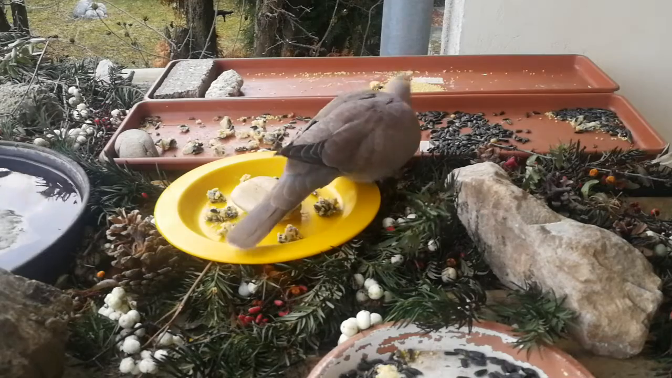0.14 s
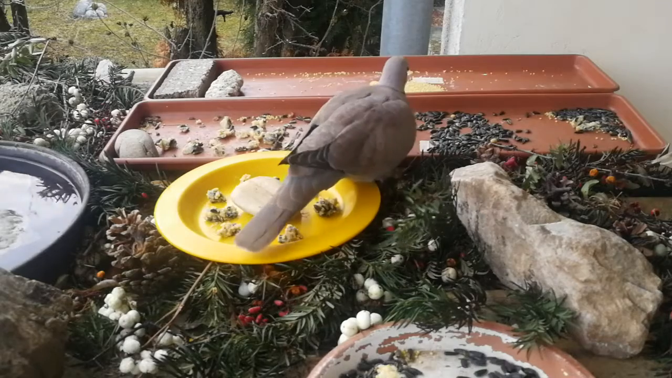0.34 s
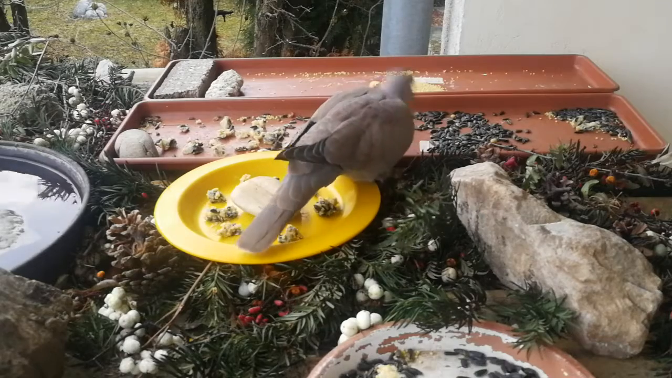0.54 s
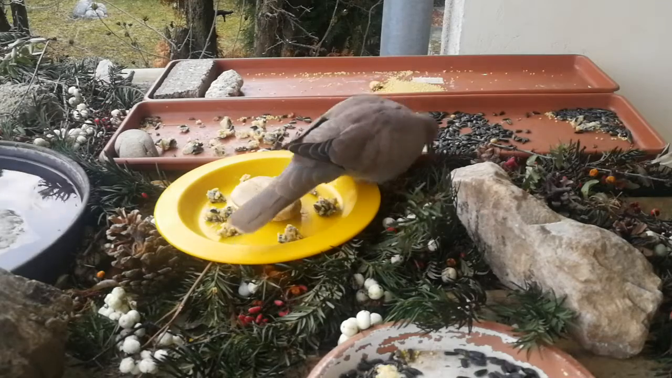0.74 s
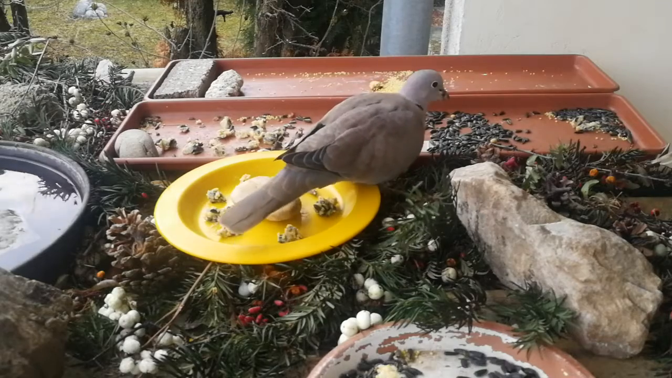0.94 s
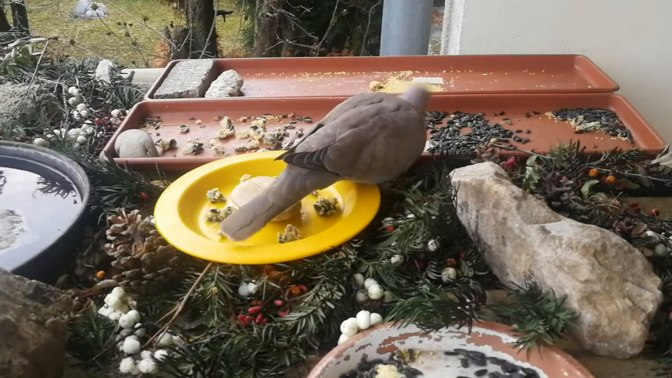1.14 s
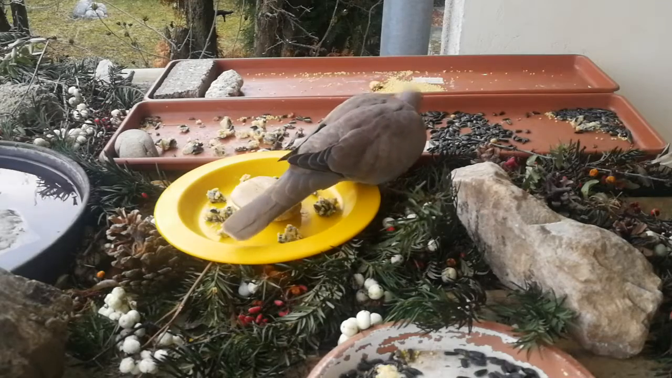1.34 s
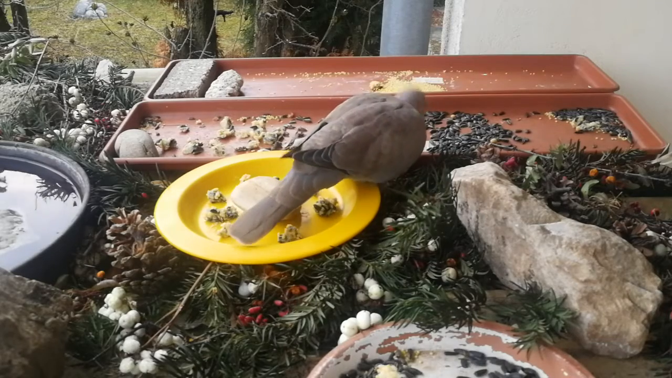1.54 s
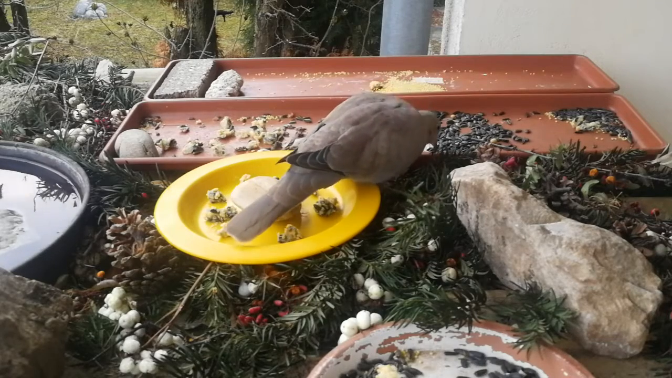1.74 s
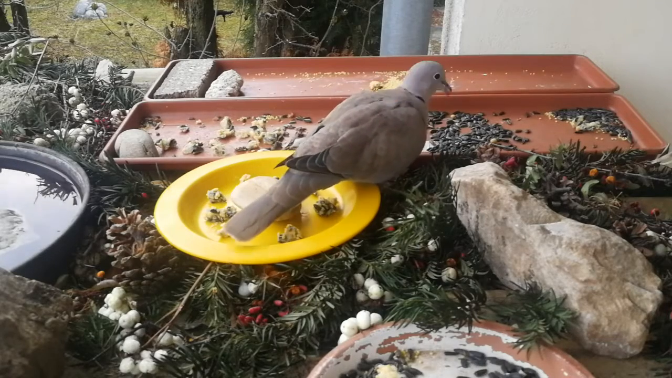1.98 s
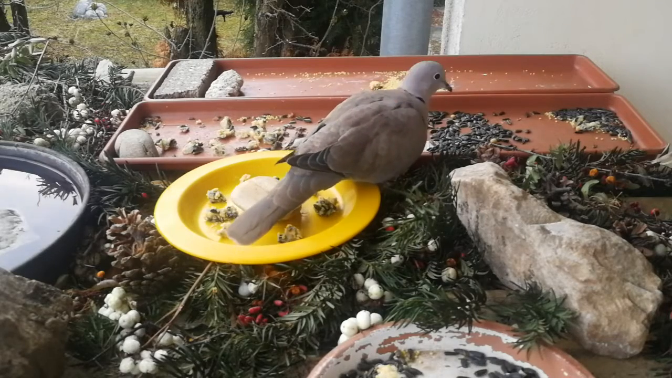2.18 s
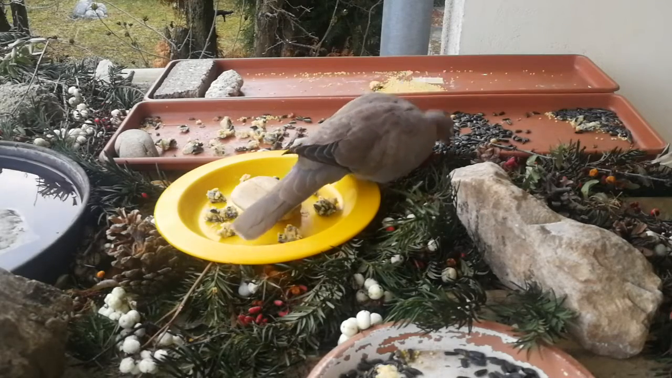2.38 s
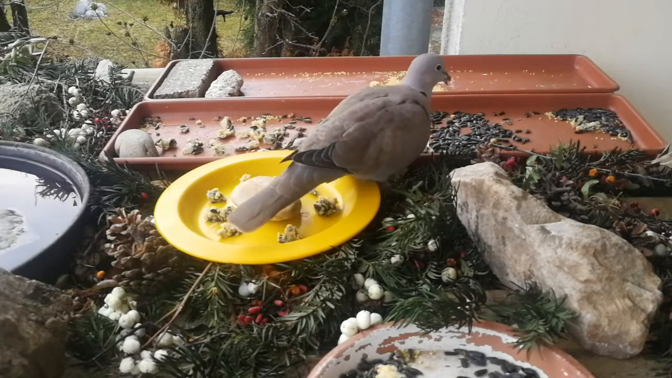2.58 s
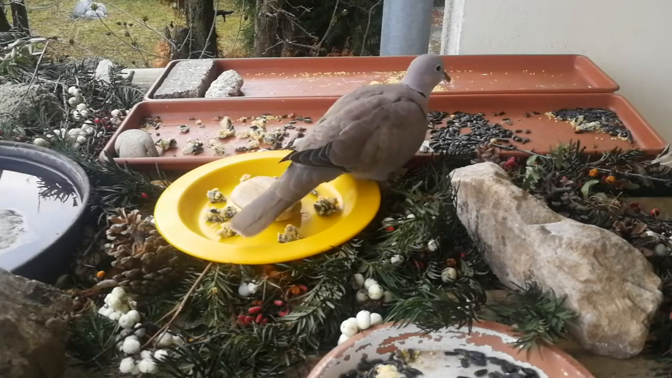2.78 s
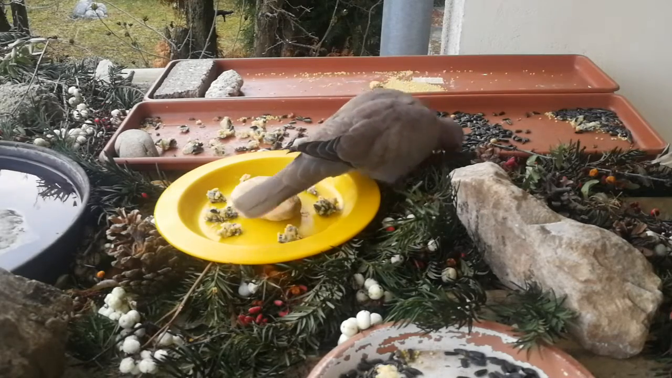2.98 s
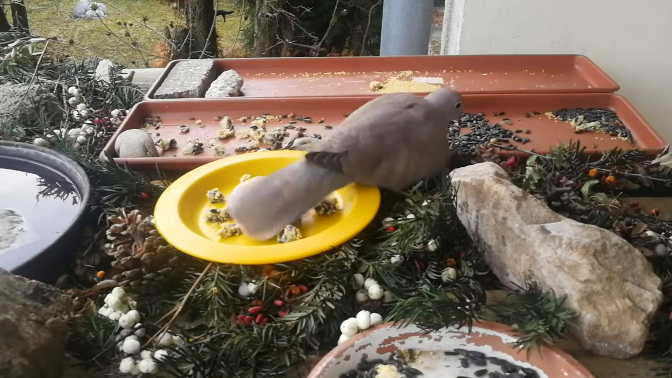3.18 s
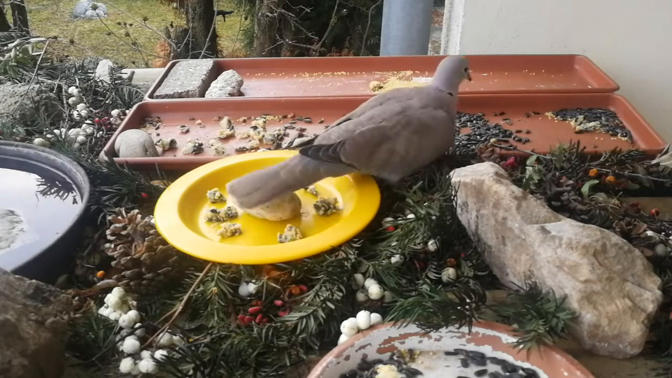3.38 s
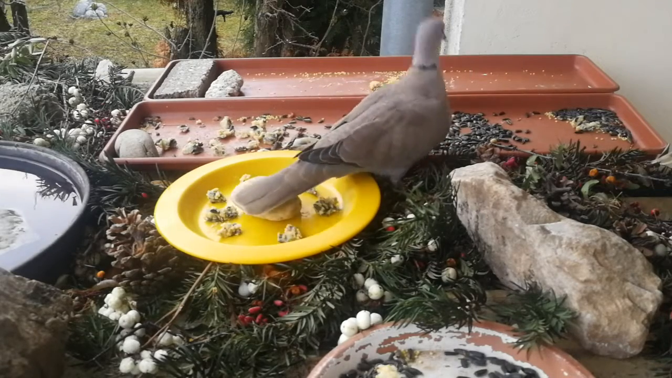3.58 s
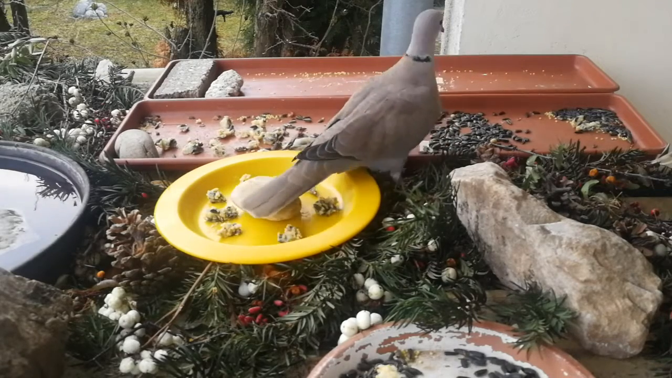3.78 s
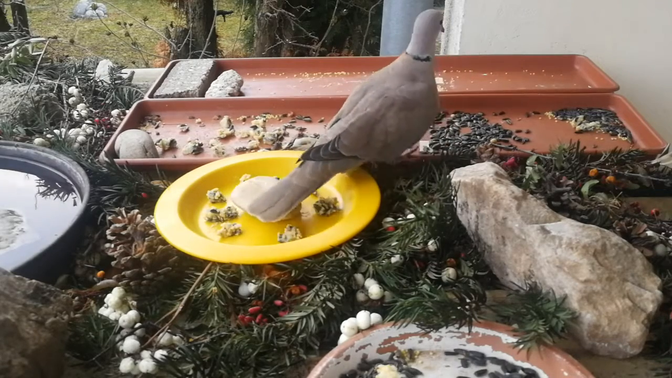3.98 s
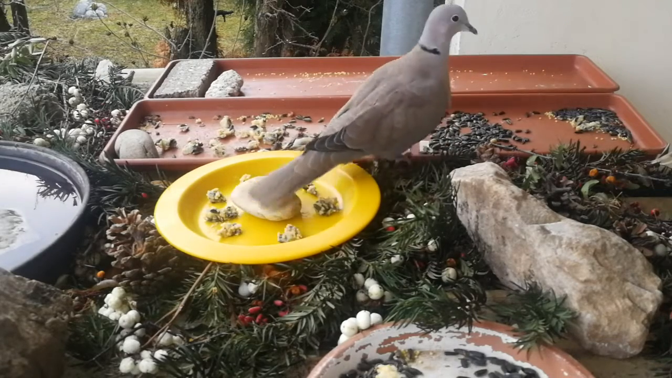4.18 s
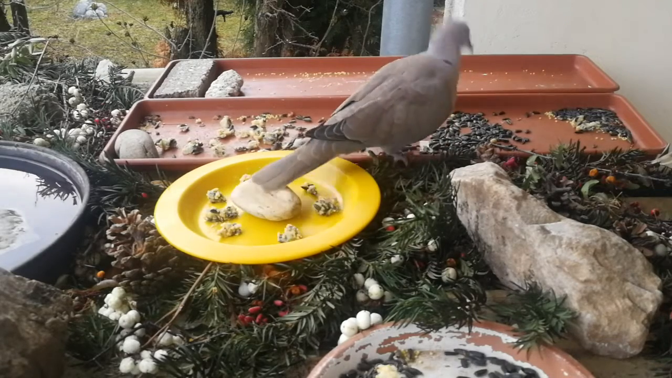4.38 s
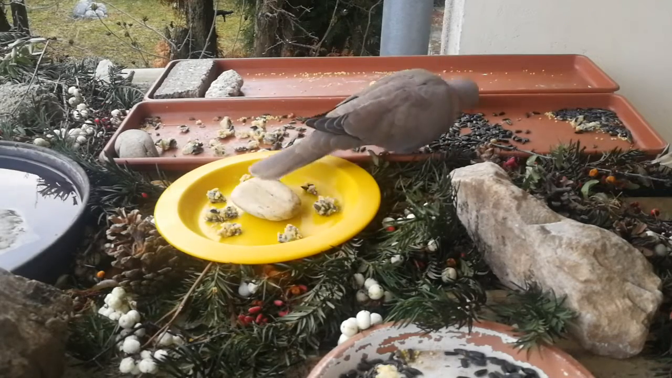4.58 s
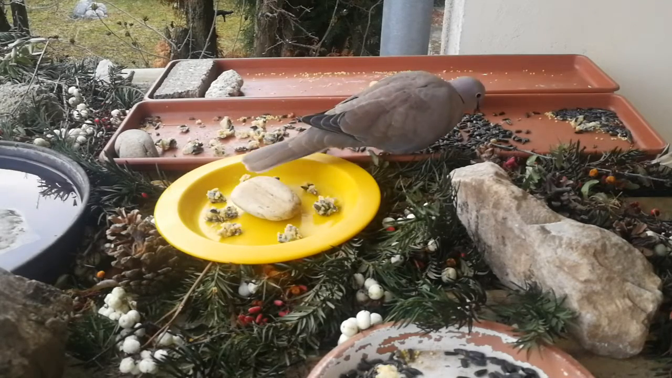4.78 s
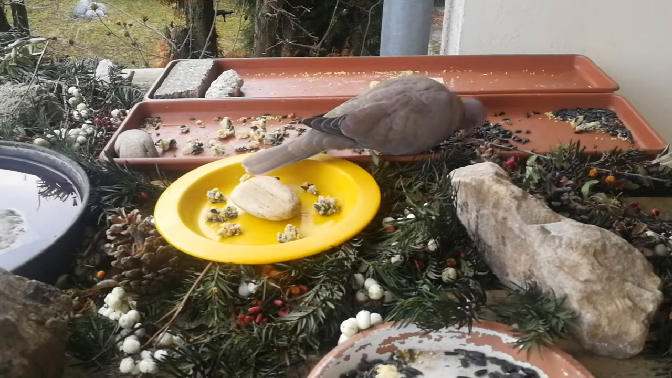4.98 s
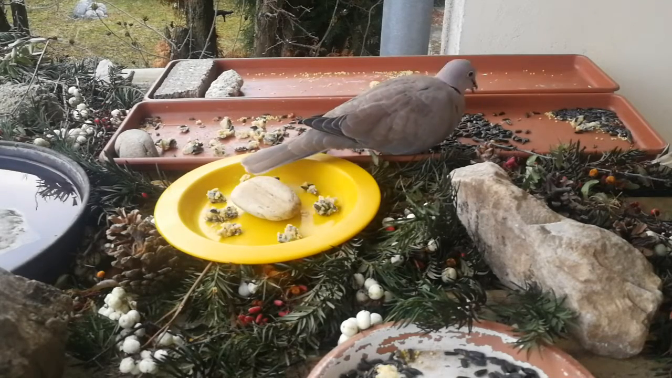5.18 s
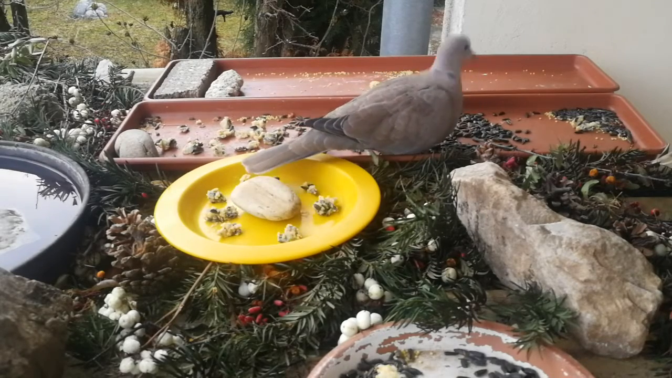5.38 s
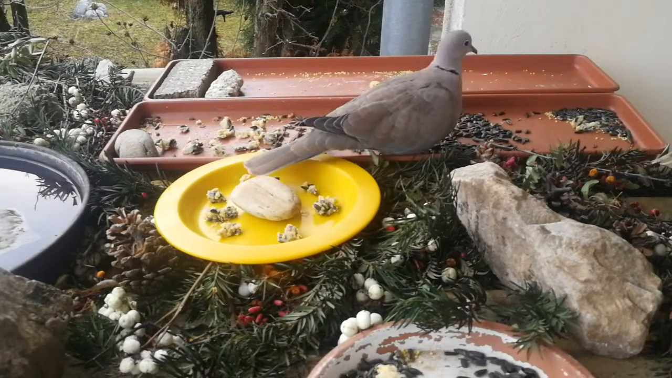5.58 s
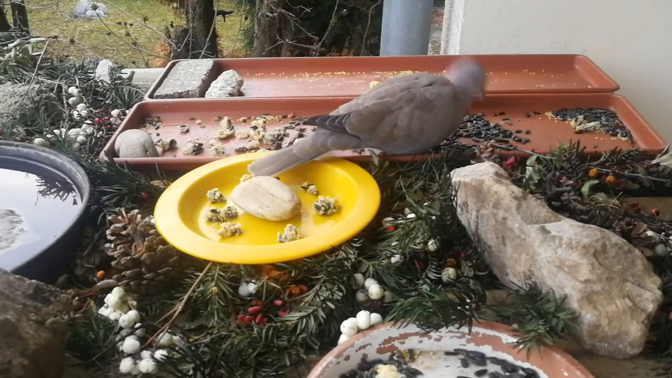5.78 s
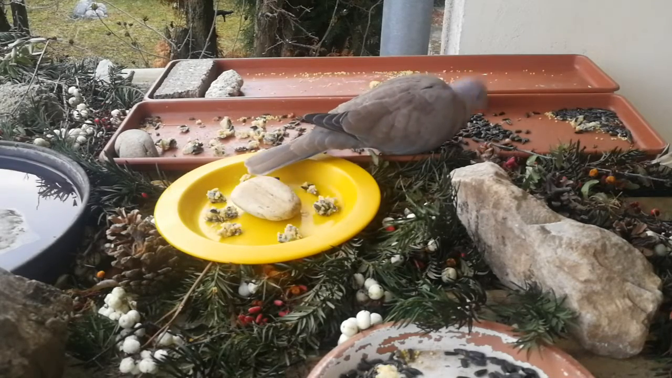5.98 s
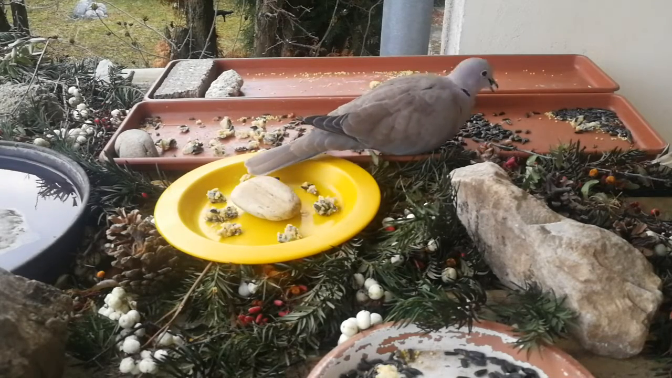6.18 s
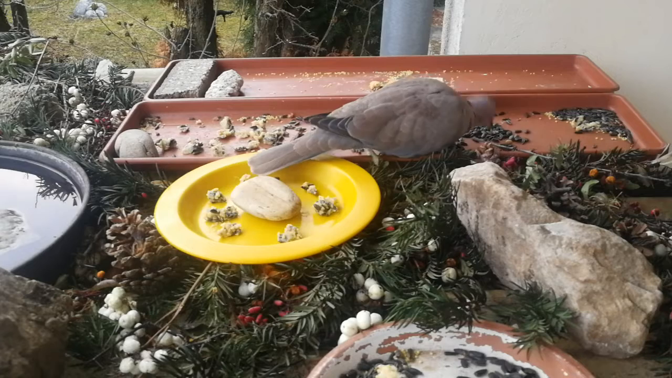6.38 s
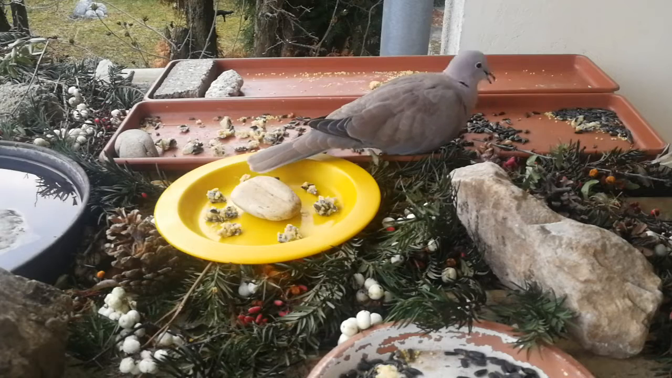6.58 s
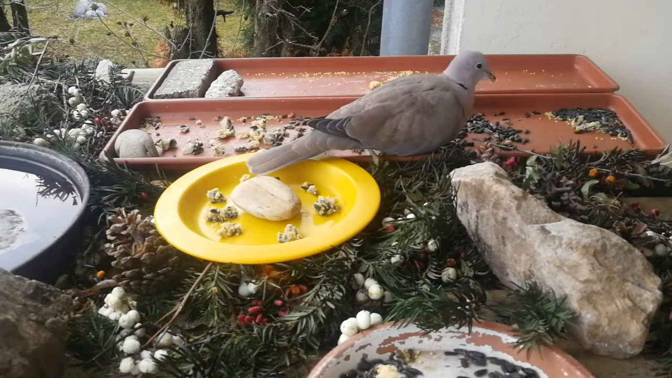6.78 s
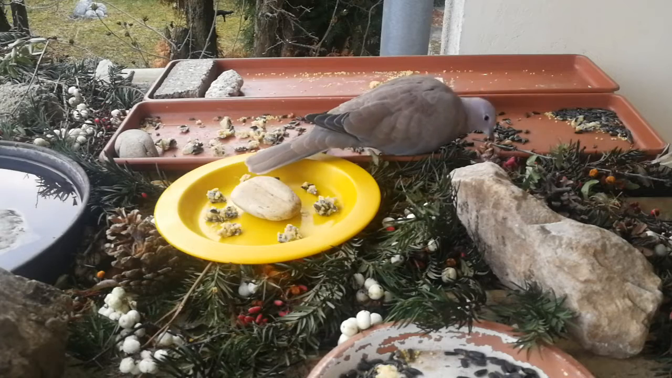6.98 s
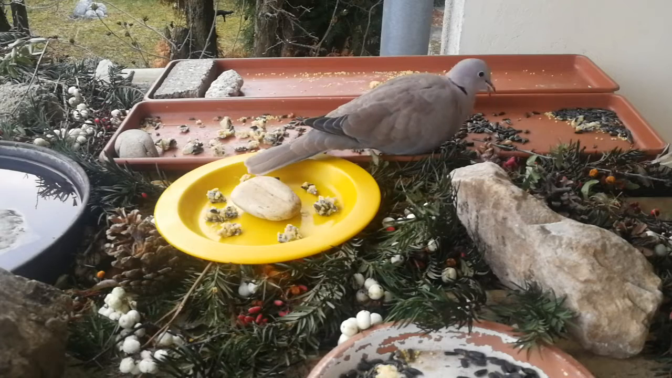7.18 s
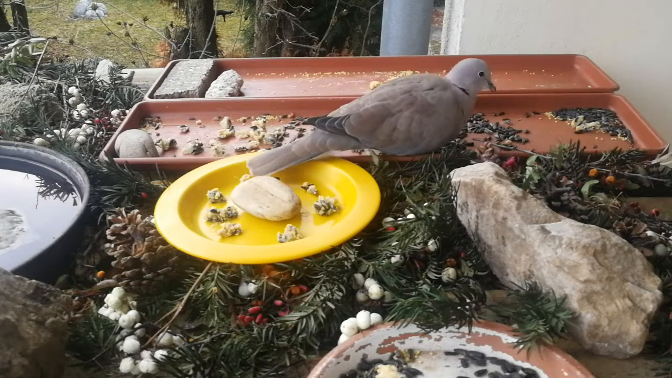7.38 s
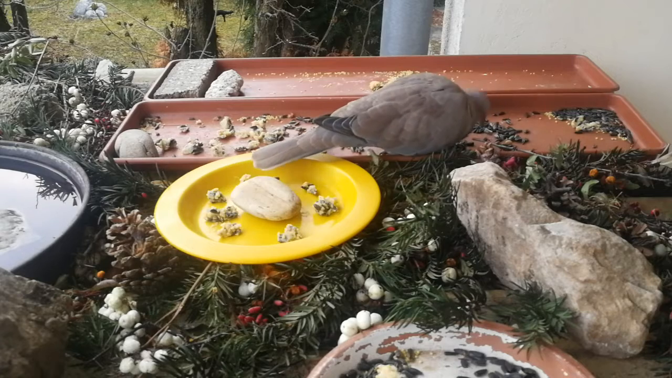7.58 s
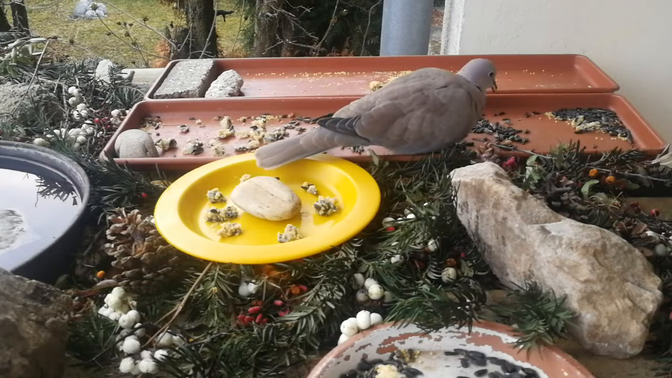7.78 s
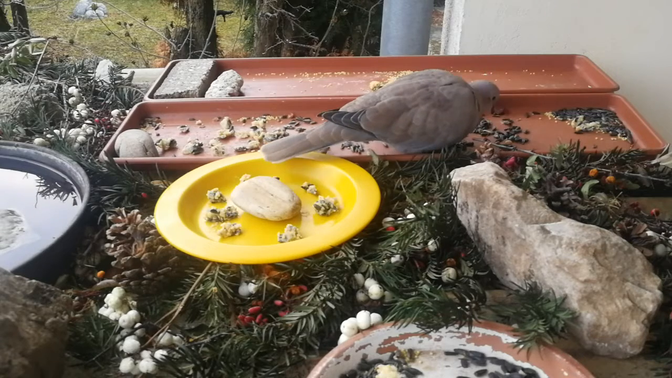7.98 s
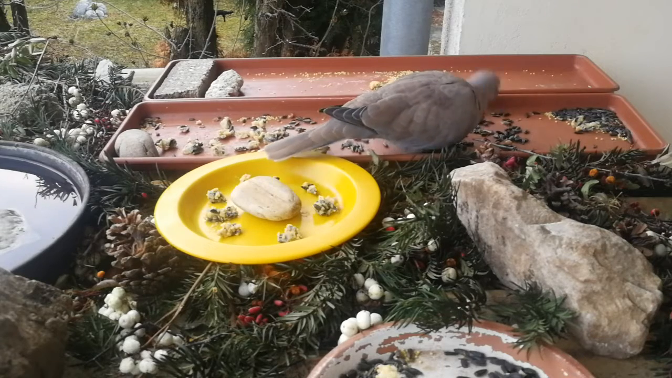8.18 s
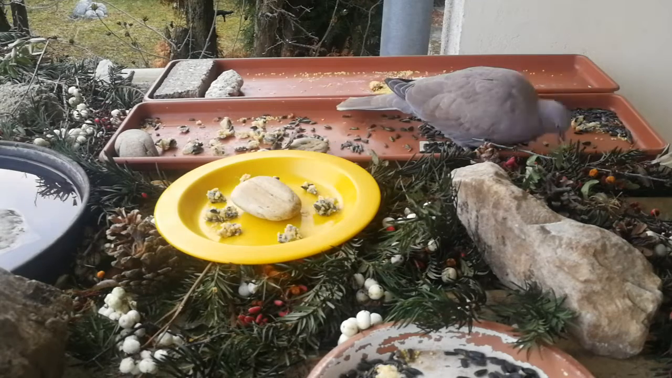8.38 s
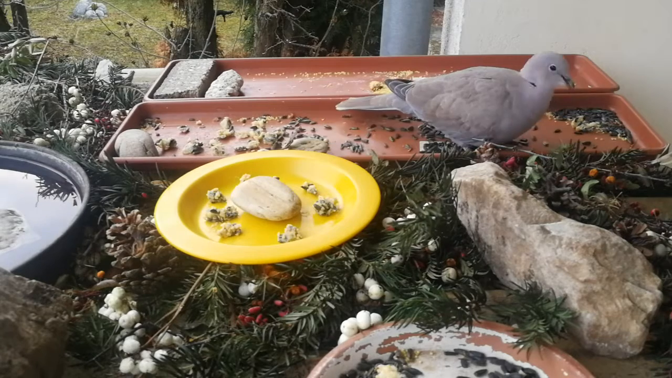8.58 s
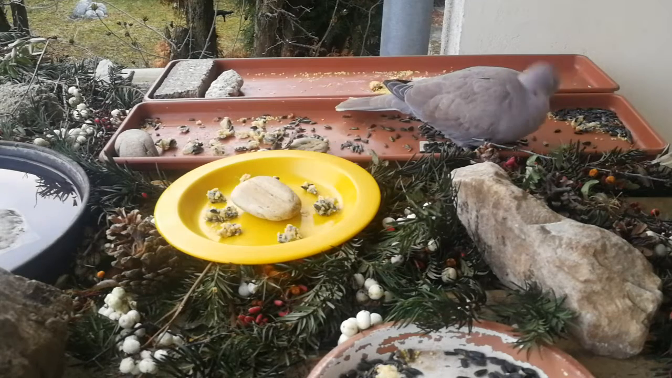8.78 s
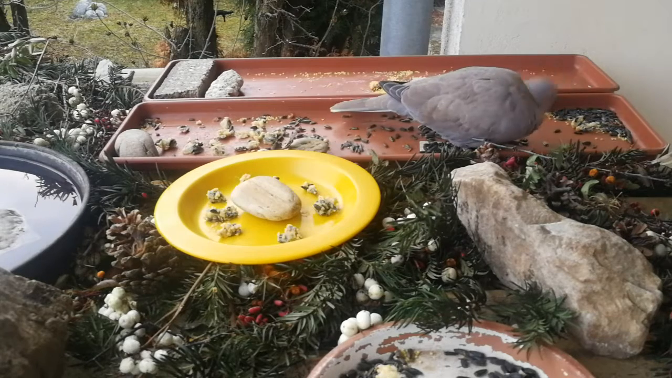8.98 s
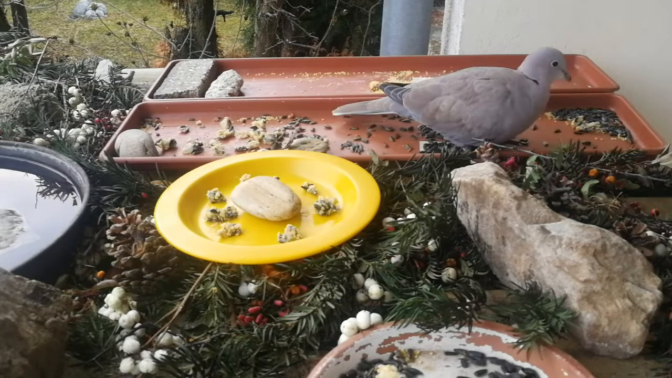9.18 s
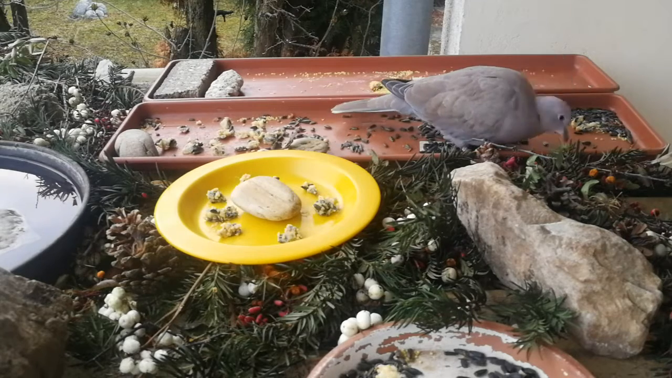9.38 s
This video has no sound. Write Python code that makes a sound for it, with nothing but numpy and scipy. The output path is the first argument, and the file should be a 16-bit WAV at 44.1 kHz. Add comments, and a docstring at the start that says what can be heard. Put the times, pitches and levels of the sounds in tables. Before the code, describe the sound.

Close up on a quiet balcony, a dove pecks seed from a plastic tray: short hollow knocks with low tray resonance, bright seed clicks and skittering husks. Early on, low wind gusts nudge the microphone and a few chips sound in the garden. Around four seconds two strong foot thuds shake the tray, then pecking grows more frequent. Faint whistles come from the left over a soft distant wash.

```python
"""Dove pecking at a seed tray

A dove pecks seed from a plastic tray on a quiet balcony and shifts its feet on the rim.
Pecks and steps are noise bursts and dying modes; seeds are short resonant clicks; husks are random grains.
Small birds call from the garden as hoarse or clear gliding tones, and strokes of fine crackle rustle.
Light gusts of low noise brush the microphone over a far wash; the walls answer with noise reflections."""
import sys
import numpy as np
from scipy import signal
from scipy.io import wavfile
from scipy.ndimage import uniform_filter1d

SR = 44100
rng = np.random.default_rng(int(sys.argv[2]) if len(sys.argv) > 2 else 0)


def master_out(mix):
    """Clip the mix to full scale and print it as 16-bit PCM to the path in sys.argv[1]."""
    frames = np.transpose(np.atleast_2d(mix))
    ceiling = np.clip(frames, -1, 1)
    pcm = np.round(ceiling * 32767).astype(np.int16)
    wavfile.write(sys.argv[1], SR, pcm)


N = 416744
T = np.arange(SR * 2 // 5) / SR  # time within one blow, s


def gain_of(db):
    """Turns decibels into an amplitude factor."""
    return 10 ** (np.asarray(db) / 20)


def evened(x):
    """Scales a sound to rms 1."""
    return x / np.sqrt(np.mean(x ** 2) + 1e-20)


def sized(x):
    """Scales a sound so that its loudest two milliseconds have rms 1."""
    return x / np.sqrt(uniform_filter1d(x ** 2, size=88).max() + 1e-20)


def read(points, hz):
    """Reads a curve at hz, interpolating on a log frequency axis."""
    f, value = np.transpose(points)
    return np.interp(np.log(hz + 1), np.log(f), value)


def add(mix, s, sound):
    """Mixes a sound in at time s, cut off at the end of the mix."""
    part = mix[..., max(round(s * SR), 0):][..., :sound.shape[-1]]
    part += sound[..., :part.shape[-1]]


def coloured(x, points, size=2048):
    """Filters with the given spectrum in minimum phase, so attacks stay sharp."""
    log_gain = np.log(gain_of(read(points, abs(np.fft.fftfreq(size, 1 / SR)))))
    minimum_phase = np.exp(np.conj(signal.hilbert(log_gain)))
    taps = np.fft.ifft(minimum_phase).real[:size // 2]
    return signal.oaconvolve(x, taps)[:len(x)]


def softened(x, edge_hz):
    """Rolls off the top gently above an edge."""
    return signal.lfilter(*signal.butter(1, min(edge_hz, .45 * SR), fs=SR), x)


def resonate(x, hz, width_hz):
    """Excites one resonance with a peak gain near 1."""
    r = np.exp(-np.pi * width_hz / SR)
    pole = r * np.exp(2j * np.pi * hz / SR)
    return 2 * signal.lfilter([1 - r], [1, -pole], x).real


def decay(t60):
    """Falls exponentially by 60 dB in t60 seconds."""
    return np.exp(-np.log(1000) * T / t60)


def burst(t60):
    """Makes a dying puff of noise: a rough contact."""
    return rng.standard_normal(len(T)) * decay(t60)


def ring(modes, spread_db):
    """Sums dying modes, weighted and tuned a little differently at each blow."""
    hz, db, t60 = np.transpose(modes)[:, :, None]
    db = db + spread_db * rng.standard_normal(hz.shape)
    detune = rng.normal(1, 0.0182, hz.shape)
    turns = hz * T * detune + rng.random(hz.shape)
    return sized((gain_of(db) * decay(t60) * np.sin(2 * np.pi * turns)).sum(0))


def grains(per_s, spread_db):
    """Scatters tiny impacts of uneven size, at a rate that may change."""
    count = len(per_s)
    size_db = spread_db * np.minimum(rng.exponential(1, count), 3)
    size = gain_of(size_db) * rng.choice([-1, 1], count)
    return size * (rng.random(count) < per_s / SR)


def room(x, tail_t60, early_db, late_db, early_t60=0.14):
    """Adds dense near reflections and a coloured tail, drawn afresh for each ear and each sound."""
    hz, t, z = signal.stft(rng.standard_normal((2, len(T))), SR, nperseg=256)
    fading = z * np.exp(-np.log(1000) * t / read(tail_t60, hz)[:, None])
    late = signal.istft(fading, SR, nperseg=256)[1][:, :len(T)]
    late = late * np.minimum(T / 0.023, 1)
    early = np.array([burst(early_t60), burst(early_t60)]) * np.minimum(T / 0.0033, 1)
    reflections = gain_of(early_db) * evened(early) + gain_of(late_db) * evened(late)
    return signal.oaconvolve(x[None], reflections / np.sqrt(len(T)), axes=1)[:, :len(x)]


def placed(x, left_db, lead_s=0):
    """Pans a direct sound by level, and delays the right ear by lead_s."""
    samples = np.arange(len(x))
    delayed = np.interp(samples - lead_s * SR, samples, x, left=0)
    return np.array([x * gain_of(left_db / 2), delayed / gain_of(left_db / 2)])


def swell(sound, db, edge_hz, attack_s, release_s, fade_db_per_s):
    """Dulls a noise above its edge; it then swells, fades slowly and lets go."""
    t = np.arange(sound.shape[-1]) / SR
    level = gain_of(db + fade_db_per_s * t)
    dulled = evened(softened(sound, edge_hz))
    return dulled * level * np.minimum(t / attack_s, 1) * np.minimum(t[::-1] / release_s, 1)


# Colour of the distant outdoor wash: pitch_hz, relative_level_db (per Hz)
WASH_COLOUR = [(20, -1), (45, 3), (85, -1), (125, -5), (190, -2.5), (310, -5.5), (500, -7.5), (850, -5.5),
               (1300, -5.5), (1700, -11), (2300, -16.5), (4000, -20.5), (7000, -23.5), (15000, -29)]
# Likeness of the wash at left and right: pitch_hz, likeness (0-1)
WASH_LIKENESS = [(60, 1), (200, 0.98), (450, 0), (1000, 0), (4000, 0.01), (14000, 0)]
WASH_DB = -59.5  # before the small lift of each ear


def air():
    """The far wash of the neighbourhood: spectral noise drifting in soft patches of level."""
    hz = np.fft.rfftfreq(2048, 1 / SR)
    a, b, c, d, patches = rng.standard_normal((5, len(hz), N // 512 + 5))
    patches = uniform_filter1d(patches, size=20, axis=0)  # over frequency
    patches = evened(uniform_filter1d(patches, size=14, axis=1))  # over time
    same = np.clip(read(WASH_LIKENESS, hz), -1, 1)[:, None]
    left = a + 1j * b
    right = same * left + np.sqrt(1 - same ** 2) * (c + 1j * d)
    z = np.array([left, right]) * gain_of(read(WASH_COLOUR, hz)[:, None] + 0.91 * patches)
    wash = evened(signal.istft(z, nperseg=2048, noverlap=1536)[1][:, :N])
    return gain_of(WASH_DB) * gain_of([[1.2], [.3]]) * wash


# Colour of the buffeting: pitch_hz, relative_level_db
WIND_COLOUR = [(20, -16), (42, 4.5), (90, 3), (140, -1.5), (200, -11.5), (300, -20), (600, -46.5)]
# Gusts on the microphone: start_s, length_s, level_db (before the sag), upper_edge_hz
GUSTS = [(0.026, 0.19, -47, 250), (0.292, .29, -40, 700), (0.616, 0.2, -55, 150), (0.855, 0.2, -44.5, 160),
         (1.024, 0.17, -52.5, 100), (1.988, .1, -49.5, 90), (2.119, 0.25, -44.5, 148),
         (2.396, .19, -47, 200), (2.661, 0.14, -50.5, 250), (3.40, 0.27, -46.5, 30), (3.704, 0.2, -55, 60),
         (7.934, 0.25, -53, 60)]


def wind():
    """Lumpy low buffeting: gusts of dull noise, nearly the same on both sides."""
    common, left, right = (evened(coloured(noise, WIND_COLOUR)) for noise in rng.standard_normal((3, N)))
    eddies = common + gain_of(-15) * np.array([left, right])
    out = np.zeros((2, N))
    for s, length, db, edge_hz in GUSTS:
        gust = eddies[:, max(int(s * SR), 0):int((s + length) * SR)]
        add(out, s, swell(gust, db, edge_hz, attack_s=.054, release_s=.064, fade_db_per_s=-21))
    return out


def call(s, length, hz, db, start_oct, end_oct, width_hz):
    """A tone gliding past its middle pitch, blurred by slow noise as wide as its hoarseness."""
    u = np.linspace(0, 1, int(length * SR))
    glide_oct = np.polyval(np.polyfit([0, .5, 1], [start_oct, 0, end_oct], 2), u)
    phase = 2 * np.pi * np.cumsum(hz * 2 ** glide_oct) / SR
    low_pass = signal.butter(2, width_hz / 2, fs=SR, output="sos")
    blur = signal.sosfilt(low_pass, rng.standard_normal((2, len(T))))[:, -len(u):]
    hoarse = width_hz / (width_hz + 100)
    voice = (1 - hoarse + hoarse * evened(blur[0])) * np.sin(phase)
    voice = voice + hoarse * evened(blur[1]) * np.cos(phase)
    # the clearer the call, the more its overtone shows
    voice = voice + gain_of(-11.5) * (1 - hoarse) ** 3 * np.sin(2 * phase)
    return s, gain_of(db) * evened(voice) * signal.windows.tukey(len(u), .6)


# Call levels are set before the fades, the panning and the distance trim in birds().
# Plain whistles from the garden: start_s, length_s, pitch_hz, level_db
WHISTLES = [(1.073, .09, 4370, -73), (2.27, 0.21, 3020, -61), (2.744, 0.11, 4220, -72),
            (4.456, 0.28, 3030, -57), (5.674, 0.14, 2965, -56), (6.434, 0.18, 3080, -53.5),
            (6.685, 0.15, 2950, -60.5), (7.254, 0.18, 3070, -61), (7.409, .17, 3025, -56),
            (8.279, .12, 3260, -53.5), (8.682, .2, 2946, -59)]
# Short falling chips: start_s, pitch_hz, level_db
CHIPS = [(3.432, 2520, -38.5), (3.544, 2557, -35.5), (3.729, 2450, -42), (3.895, 2470, -53)]
# Thin arched notes, very high: start_s, length_s, pitch_hz, level_db
SEEPS = [(0.932, .11, 7600, -66.5), (1.788, 0.099, 7800, -58), (2.345, .14, 7450, -68),
         (5.693, .035, 6600, -65)]
# One hoarse call: start_s, length_s, pitch_hz, level_db
RASP = (1.19, .135, 4230, -55)
# Echoes of the garden: pitch_hz, t60_s
GARDEN = [(2000, .26), (9000, .22)]


def birds():
    """Whistles, chips, thin high notes and one rasp, softened by the garden's echoes."""
    song = np.zeros(N)
    for row in WHISTLES:
        add(song, *call(*row, start_oct=-0.0593, end_oct=-0.0063, width_hz=174))
    for s, hz, db in CHIPS:
        add(song, *call(s, 0.0236, hz, db, start_oct=0.108, end_oct=-0.056, width_hz=41))
    for row in SEEPS:
        add(song, *call(*row, start_oct=-0.072, end_oct=-0.27, width_hz=780))
    add(song, *call(*RASP, start_oct=0, end_oct=-0.203, width_hz=1300))
    direct = placed(song, left_db=13.5) * gain_of(-9)
    return direct + room(song, GARDEN, early_db=-6, late_db=-10.5)


# Decay of the balcony's reflections: pitch_hz, t60_s
BALCONY = [(200, 0.53), (1000, 0.38), (3000, 0.38), (7000, 0.25), (15000, 0.22)]
# Colour of the rustle: pitch_hz, relative_level_db
FEATHER_COLOUR = [(200, 3.5), (500, -4), (1200, 1), (2200, -2), (4000, -4.5), (7000, -4), (11000, -2.5),
                  (16000, 1)]
# Strokes of feathers and feet over the seed: start_s, length_s, level_db (before fade and pan), upper_edge_hz
STROKES = [(0.68, .11, -54.5, 4000), (0.792, 0.132, -52.5, 4000), (2.906, 0.22, -59.5, 6100),
           (3.231, .13, -53, 3070), (3.376, 0.24, -53.5, 14800), (3.627, 0.385, -62, 6000),
           (3.933, 0.052, -56, 5000)]


def rustle():
    """Feathers and feet drag over the seed in uneven strokes of fine crackle."""
    drift = uniform_filter1d(uniform_filter1d(rng.standard_normal(N), size=1000), size=500)
    pressure = gain_of(3.5 * evened(drift))
    crackle = coloured(grains(np.full(N, 1800), spread_db=5) * pressure, FEATHER_COLOUR)
    brush = np.zeros(N)
    for s, length, db, edge_hz in STROKES:
        stroke = crackle[int(s * SR):int((s + length) * SR)]
        add(brush, s, swell(stroke, db, edge_hz, attack_s=.025, release_s=.039, fade_db_per_s=-12))
    echo = gain_of([[1.5], [-1.5]]) * room(brush, BALCONY, early_db=1.5, late_db=-3)
    return placed(brush, left_db=9.0) + echo


# Bending modes of the tray floor, tuned afresh at each blow: pitch_hz, relative_level_db, t60_s
FLOOR_MODES = [(83.4, -8.5, 0.33), (112.2, -5, 0.2), (166.1, 2, .25), (219.6, -4.5, 0.27),
               (290.4, 1.5, 0.12), (313.7, -3, 0.18), (367.7, -9, 0.29), (445, -5.5, 0.16),
               (487, -10.5, 0.22)]


def boom(favoured_hz, swell_s=0.014):
    """The tray floor takes time to start swinging; modes away from the favoured pitch are weaker."""
    hz, db, t60 = np.transpose(FLOOR_MODES)
    weight_db = db - 11 * np.minimum(abs(np.log2(hz / favoured_hz)), 1)
    swing = ring(np.transpose([hz, weight_db, t60]), spread_db=1.2)
    return sized(swing * (1 - np.exp(-(T / swell_s) ** 2)))


# Colour of hard, light contacts: pitch_hz, relative_level_db
TICK_COLOUR = [(500, -12.5), (1500, -1), (3000, 0), (5000, 0), (7500, 0), (10500, -6.5), (16000, -13)]


def seed_click(t60, hz, ring_db):
    """A crack with one short resonance; lower-pitched clicks lose more of their top."""
    crack = coloured(burst(t60) * (1 - np.exp(-T / .0006)), TICK_COLOUR)
    click = sized(crack) + gain_of(ring_db) * sized(resonate(crack, hz, width_hz=1900))
    return softened(click, 5.5 * hz)


# Colour of a foot's thud: pitch_hz, relative_level_db
THUD_COLOUR = [(100, -17), (240, 3), (350, -2), (520, -8), (800, 0), (1100, 2), (1750, -11), (3300, -23),
               (8000, -42)]
# Feet on the rim, levels before the trims in steps(): start_s, thud_db, boom_db, claw_db
STEPS = [(3.036, -43, -59, -33), (3.273, -40.5, -50, -57), (3.323, -54, -48, -46), (3.689, -48.5, -68, -66),
         (4.003, -21.5, -21.5, -26.5), (4.125, -27, -25, -27.5), (4.518, -41.5, -69, -37.5),
         (7.899, -44.5, -73, -49)]
WEIGHT_LAG_S = .004  # the foot's weight follows its claws


def steps():
    """A claw lands first, then the foot thuds; the whole tray swings under its weight."""
    out = np.zeros((2, N))
    for s, thud_db, boom_db, claw_db in STEPS:
        foot = gain_of(claw_db - 11) * sized(seed_click(0.038, hz=2200, ring_db=14))
        thud = sized(coloured(burst(0.08) * (1 - np.exp(-T / 0.0016)), THUD_COLOUR))
        add(foot, WEIGHT_LAG_S, gain_of(thud_db - 3.5) * thud)
        low = gain_of(boom_db - 11.5) * boom(favoured_hz=260, swell_s=0.037)
        echo = room(foot, BALCONY, early_db=-3, late_db=-5, early_t60=0.12)
        add(out, s, placed(foot, left_db=8.0, lead_s=0.000625) + echo)
        add(out, s, placed(low, left_db=-0.5))
    return out


# A typical snap, from which ring and reflections vary
SNAP_DB, SNAP_RING_DB, RING_GROWTH = -41.5, -7, 0.36  # growth: dB of ring per dB of level
SNAP_HZ, SNAP_WET_DB, WET_DB_PER_OCTAVE = 3400, 2, -0.2


def nibbles():
    """The beak works the seed: a faint click at a chance moment after each peck, in rows like SEEDS."""
    rows = []
    for s, _, _, _, husks_db, *_ in PECKS:
        click_s = s + rng.uniform(.07, .17)
        click_db = husks_db + rng.uniform(-17, -9)
        rows.append((click_s, click_db, SNAP_HZ * 2 ** rng.uniform(-.5, 0.33)))
    return rows


# Seeds snapping in the beak or dropping back: start_s, level_db (before the trim in seeds()), pitch_hz
SEEDS = [(0.206, -38, 7700), (0.401, -44.5, 2400), (0.616, -51, 3130), (0.669, -47.5, 6860),
         (0.7076, -47, 5270), (0.7525, -61, 6970), (1.4402, -44.5, 2710), (1.4893, -44, 2380),
         (1.6825, -38.5, 2720), (1.763, -42, 2200), (1.895, -46, 3420), (1.9893, -38, 2520),
         (2.5333, -26, 7100), (2.583, -36.5, 4630), (2.94, -47.5, 2270), (2.9916, -43.5, 2370),
         (3.0128, -41.5, 2310), (3.056, -33, 3650), (3.1292, -41.5, 2310), (3.168, -45, 3300),
         (3.388, -45, 9000), (3.403, -43, 4850), (4.0926, -45.5, 2800), (4.1907, -42, 3330),
         (4.374, -48, 3190), (4.6259, -45.5, 2800), (4.7741, -29, 8300), (4.807, -36.5, 4500),
         (4.8893, -48, 3980), (5.0408, -29.5, 7350), (5.1648, -42, 5620), (5.1772, -38.5, 3120),
         (5.2419, -33, 4630), (5.2519, -34, 3266), (5.2948, -40, 5060), (6.0565, -38, 3560),
         (6.109, -34.5, 6850), (6.183, -44, 4230), (6.2497, -50, 4030), (6.6114, -37.5, 2500),
         (6.655, -33, 6560), (6.681, -41, 2530), (6.763, -45, 2350), (7.1583, -28, 8250), (7.17, -38, 6620),
         (7.206, -39, 5030), (7.2335, -35.5, 8800), (7.9525, -39, 6690), (7.9708, -40, 3530),
         (8.0588, -38, 3600), (8.102, -46, 3760), (8.2953, -42.5, 3260), (9.4305, -34, 8300)]
SNAP_CYCLES = 52.6  # a snap's t60 in cycles, so bright ones are the shortest


def seeds():
    """Hard seeds click and the walls smear the click; louder snaps ring more, brighter ones are drier."""
    out = np.zeros((2, N))
    for s, db, hz in SEEDS + nibbles():
        ring_db = SNAP_RING_DB + RING_GROWTH * (db - SNAP_DB)
        wet_db = SNAP_WET_DB + WET_DB_PER_OCTAVE * np.log2(hz / SNAP_HZ)
        click = gain_of(db - 3) * sized(seed_click(SNAP_CYCLES / hz, hz, ring_db))
        smeared = evened(seed_click(.03, hz, ring_db)) * click.std()
        echo = room(smeared, BALCONY, early_db=0.0, late_db=-3.5)
        echo = gain_of(wet_db) * gain_of([[1.8], [-1.8]]) * echo
        add(out, s, placed(click, left_db=10.5) + echo)
    return out


# Stiffer modes of the tray walls, tuned afresh at each blow: pitch_hz, relative_level_db, t60_s
WALL_MODES = [(668, -4.5, 0.23), (748, 1, 0.15), (904, -3, 0.29), (1137, -6, 0.36), (1180, -25, 0.16),
              (1390, -13, 0.12), (1652, 12, 0.041), (2100, 9, 0.16), (2005, -22, 0.13), (2680, -29, 0.11),
              (3380, -20, 0.12), (3425, 11, 0.072)]
# Colour of the beak's knock: pitch_hz, relative_level_db
KNOCK_COLOUR = [(150, -16.5), (300, -4), (520, -7.5), (900, -5), (1600, -9), (2500, -10), (4000, -12.5),
                (8000, -29)]
# Beak on the tray, levels before the trims in pecks(): start_s, knock_db, boom_db (tray floor), tick_db,
# husks_db (scattered), spot_hz (struck spot), spot_db (its ring against the knock), floor_hz (favoured mode)
PECKS = [(0.176, -38, -36.5, -35.5, -37, 1310, -0.5, 290), (0.780, -39, -31.5, -27.5, -39.5, 980, -20, 273),
         (1.354, -36, -30.5, -37, -46, 1620, -10, 325), (1.879, -39.5, -34, -31, -37.5, 1640, -9, 260),
         (2.488, -31.5, -34.5, -34.5, -34.5, 1610, 17, 167), (3.055, -44.5, -40.5, -55, -52, 1150, 3, 163),
         (4.696, -37, -38.5, -30, -58, 1710, -20, 160), (5.047, -38.5, -42, -56, -37, 990, -9, 164),
         (5.114, -38, -46, -52, -46, 930, 1, 274), (5.993, -36.5, -31, -43, -37, 1900, -12, 164),
         (6.5, -35.5, -29, -30, -36.5, 1630, -23, 164), (7.105, -37, -35.5, -50, -40, 1660, -12, 175),
         (7.531, -38.5, -47.5, -39, -60, 1470, -7, 253), (7.621, -37.5, -35, -38, -71, 1440, -3, 160),
         (7.971, -34.5, -36, -35, -59, 1040, 0.5, 162), (8.204, -36, -32.5, -40.5, -37.5, 1100, -3, 164),
         (8.428, -42, -37, -47, -71, 1600, 1, 182), (8.73, -47.5, -51, -53, -49, 1010, -11, 272),
         (9.0, -43.5, -35.5, -40, -59, 1510, -9, 155), (9.404, -47.5, -44, -31, -47, 2250, -12, 159)]


def pecks():
    """A faint noise onset leads in; the beak knocks the plastic and sends husks skittering."""
    out = np.zeros((2, N))
    for s, knock_db, boom_db, tick_db, husks_db, spot_hz, spot_db, floor_hz in PECKS:
        contact = coloured(burst(0.044) * (1 - np.exp(-T / 0.00018)), KNOCK_COLOUR)
        # the spot that is struck favours one broad resonance of the plastic
        spot = gain_of(spot_db) * sized(resonate(contact, spot_hz, width_hz=320))
        walls = gain_of(-6.0) * ring(WALL_MODES, spread_db=2.5)
        knock = gain_of(knock_db - 2.0) * sized(sized(contact) + spot + walls)

        scatter = grains(900 * np.exp(-T / .09), spread_db=9.5) * np.exp(-T / 0.069)
        husks = gain_of(husks_db) * sized(coloured(scatter, TICK_COLOUR))
        tick = gain_of(tick_db) * sized(coloured(burst(0.023), TICK_COLOUR))
        tick = gain_of(-4.5) * (tick + husks)
        low = gain_of(boom_db - 3.5) * boom(floor_hz)
        # a faint noise onset 6 ms before the knock softens the attack
        onset = gain_of(tick_db - 26) * sized(coloured(burst(0.3), TICK_COLOUR))

        add(out, s - .006, placed(onset, left_db=19))
        add(out, s, placed(knock, left_db=5.5) + room(knock, BALCONY, early_db=6.0, late_db=-3))
        tick_echo = gain_of([[1.5], [-1.5]]) * room(tick, BALCONY, early_db=2.0, late_db=-6.5)
        add(out, s, placed(tick, left_db=10) + tick_echo)
        add(out, s, placed(low, left_db=-0.6) + room(low, BALCONY, early_db=-15.0, late_db=-31))
    return out


def scene():
    """The dove at its tray, with the garden behind."""
    return air() + wind() + birds() + rustle() + steps() + seeds() + pecks()


def record(dry):
    """The recorder's band limit: a steep low-pass at 16.1 kHz."""
    band = signal.firwin(511, 16100, window=("kaiser", 9), fs=SR)
    return signal.oaconvolve(dry, band[None], "same")


dry = scene()
out = record(dry)
master_out(out)
```